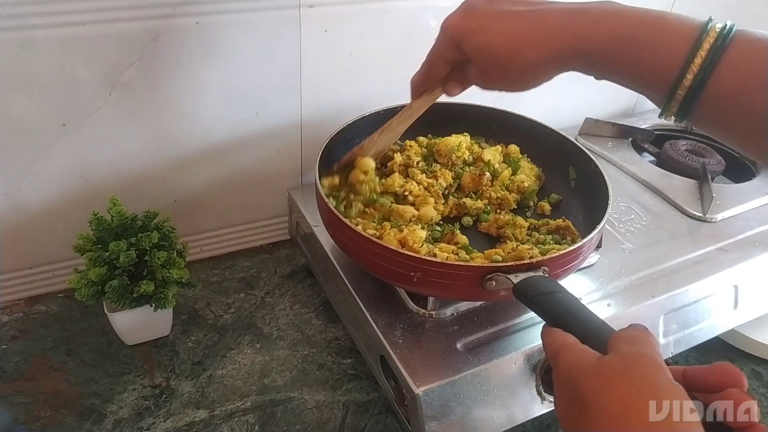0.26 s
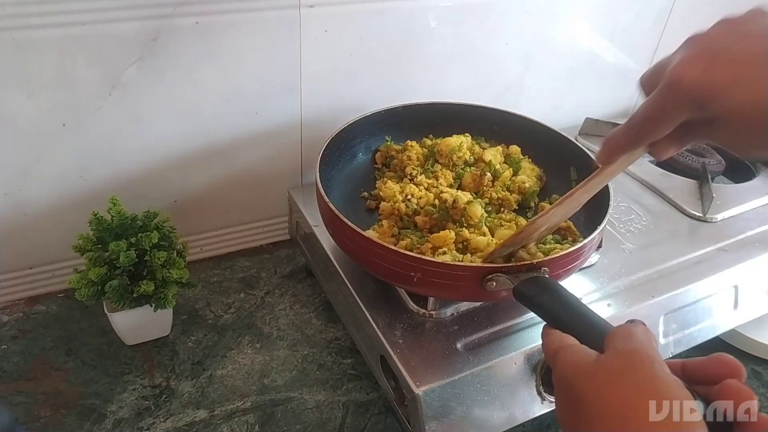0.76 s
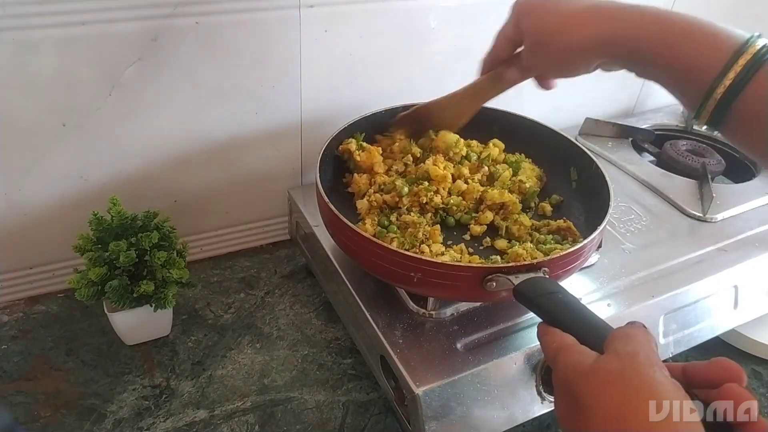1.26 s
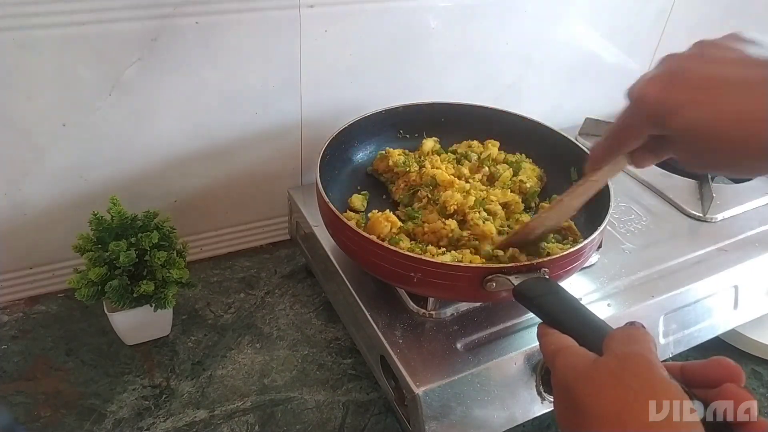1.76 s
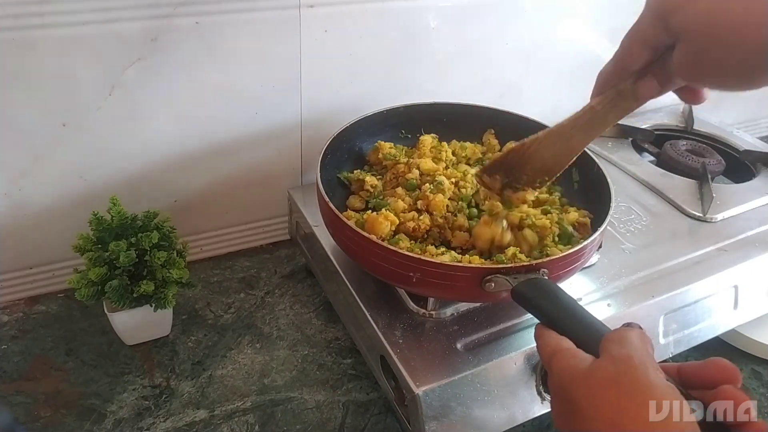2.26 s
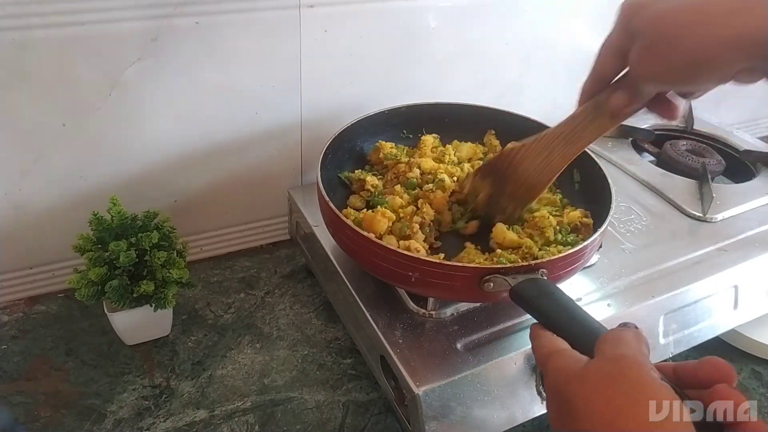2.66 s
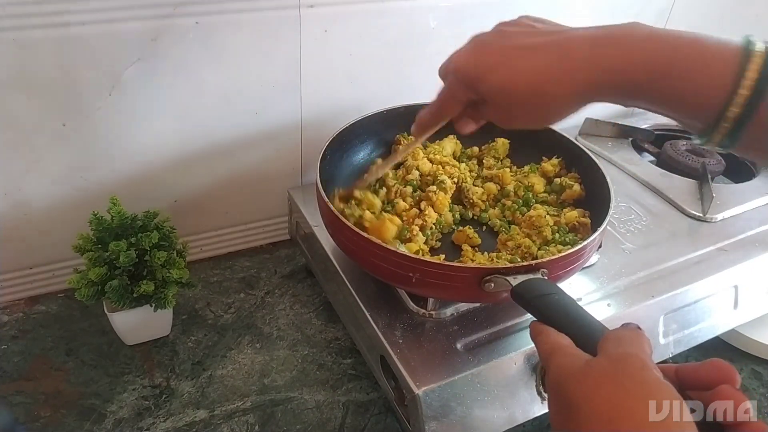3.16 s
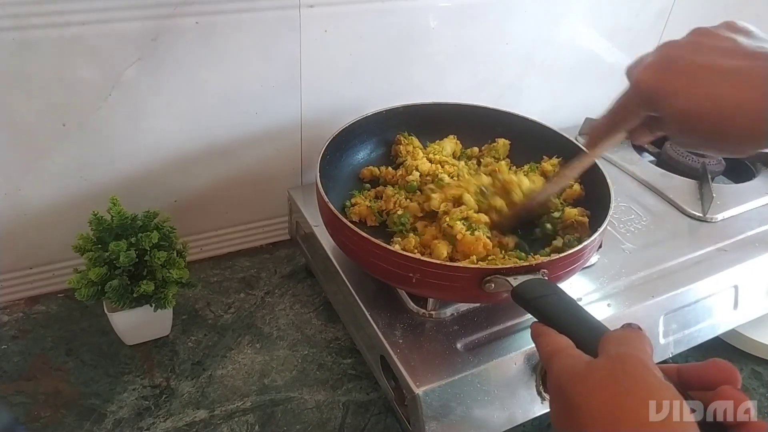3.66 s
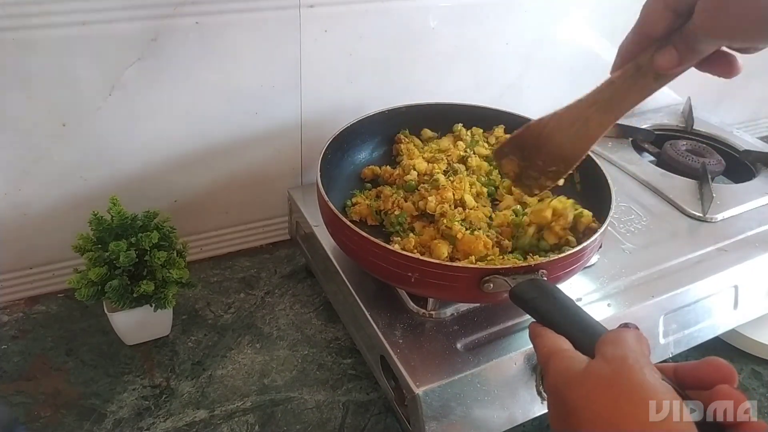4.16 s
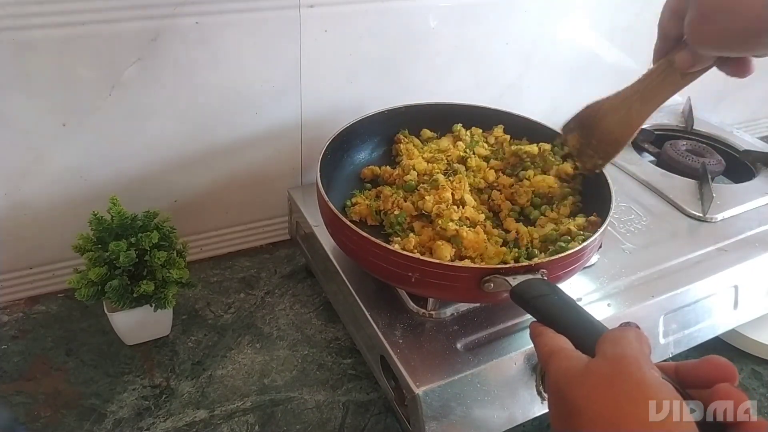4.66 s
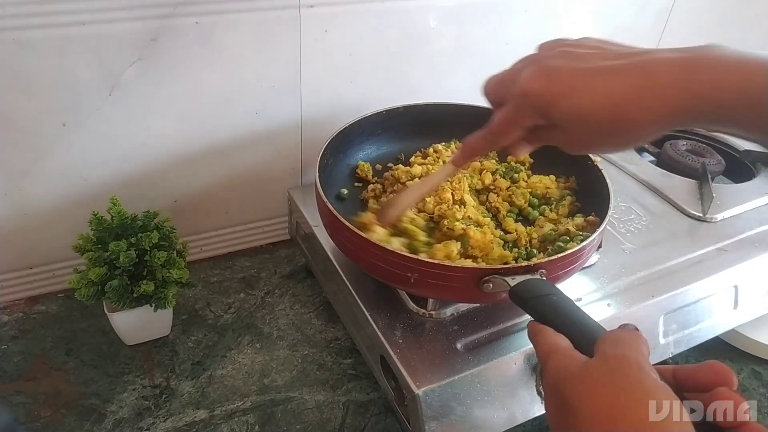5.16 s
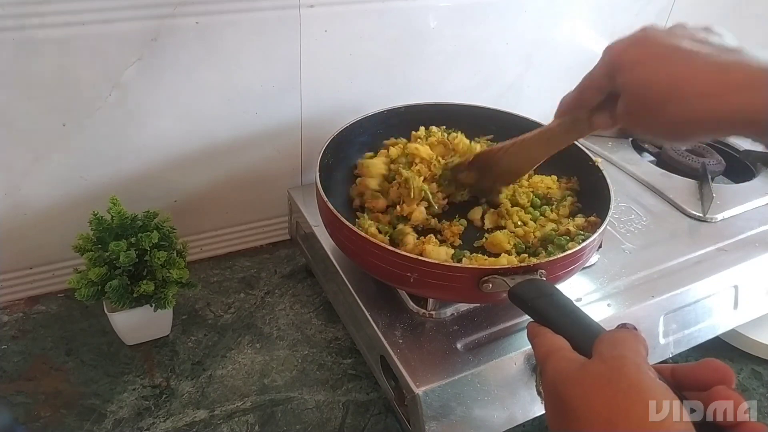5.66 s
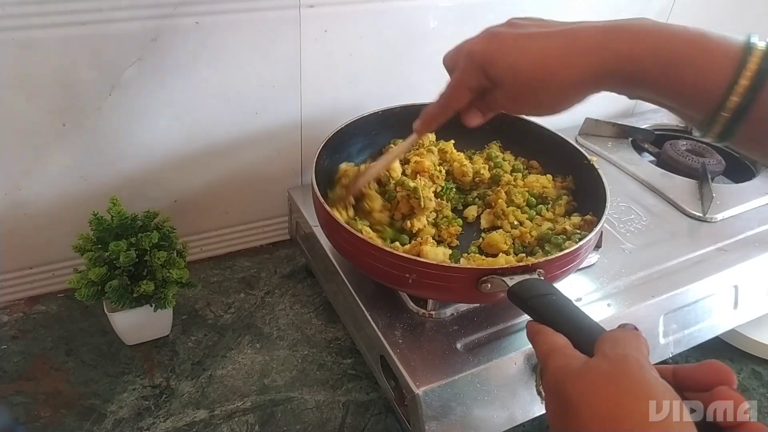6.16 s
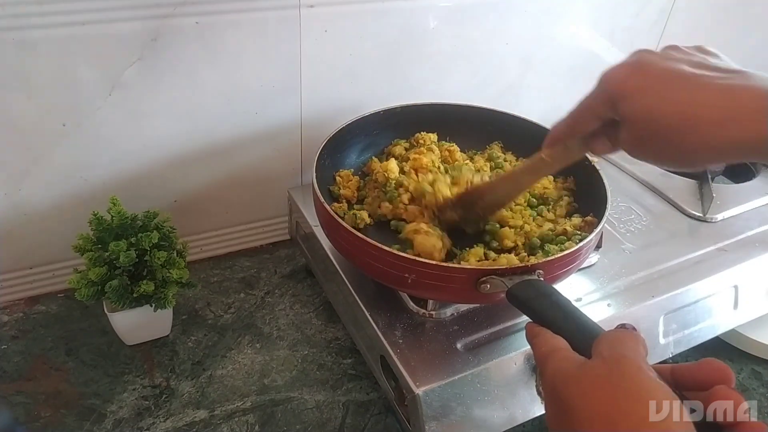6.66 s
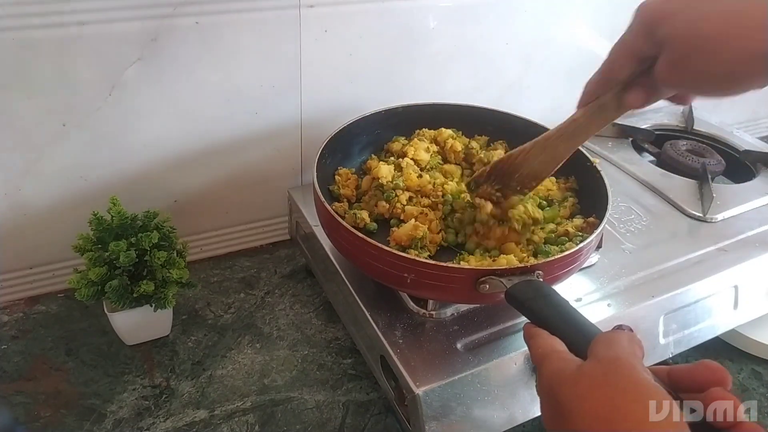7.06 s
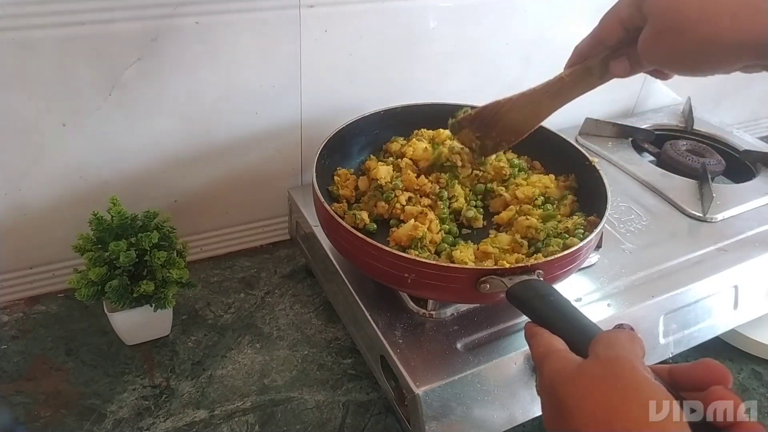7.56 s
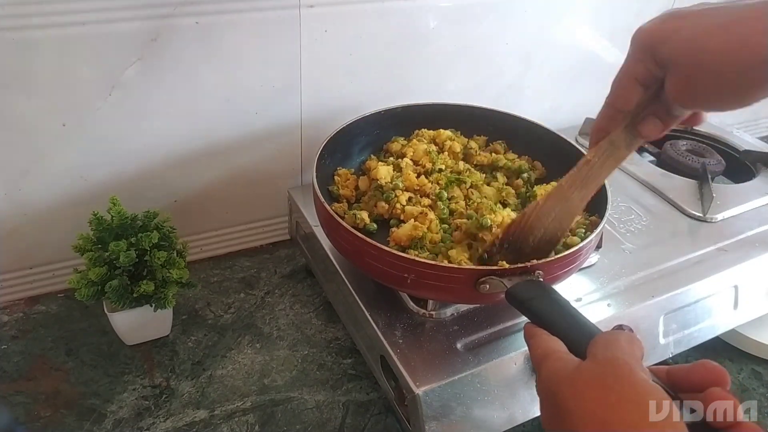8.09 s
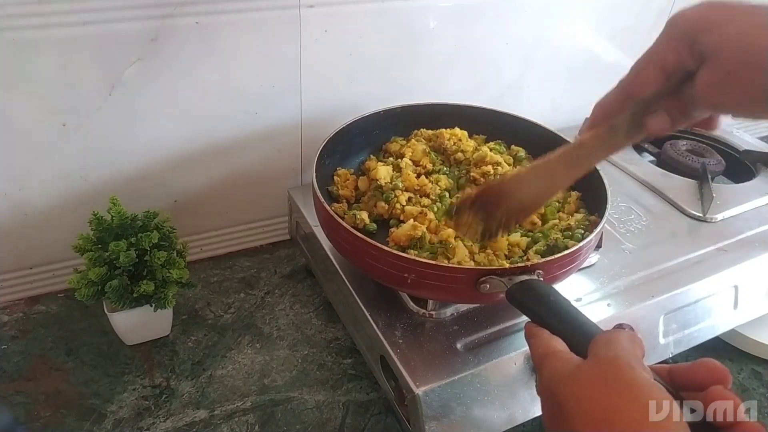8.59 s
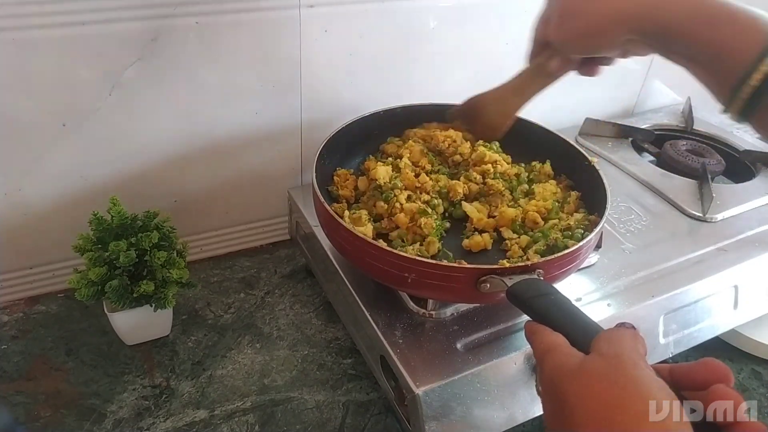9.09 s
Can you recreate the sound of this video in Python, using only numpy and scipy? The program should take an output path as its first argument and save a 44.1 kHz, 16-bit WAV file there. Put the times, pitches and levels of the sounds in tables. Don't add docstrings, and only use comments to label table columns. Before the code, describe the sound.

A wooden spatula knocks and scrapes in a coated frying pan, damp food hissing softly, bangles ticking, in a small echoing kitchen.

```python
import sys
import numpy as np
from scipy import signal
from scipy.fft import rfft, irfft, next_fast_len
from scipy.io import wavfile
from scipy.ndimage import uniform_filter1d

SR = 44100
rng = np.random.default_rng(int(sys.argv[2]) if len(sys.argv) > 2 else 0)


def volts_from_decibels(level):
    exponent = np.asarray(level, float) / 20
    return 10 ** exponent


def int16_out(signal):
    q = np.round(np.clip(np.atleast_2d(signal).T, -1, 1) * 32767)
    wavfile.write(sys.argv[1], SR, q.astype(np.int16))


N = 411453
PORT_LAG = 4

# f/Hz, level/dB, t60/s
PAN = [(152, -7, 0.086), (262.6, -12, 0.31), (345, -14, 0.85), (393.5, -2, 0.16), (462.6, 0.5, 0.11),
       (535, -0.5, 0.091), (620, -3, 0.26), (732, -4, 0.27), (794, -0.5, 0.26), (836, 0.5, 0.097),
       (1068, 5.5, 0.069), (1178, 9, 0.026), (1457, -1.5, 0.04), (1518, 8.5, 0.048), (1740, 18, 0.0083),
       (2210, 5, 0.038), (2370, 11.5, 0.0055), (2526, 10.5, 0.017), (2775, 6, 0.047), (2960, 12, 0.012),
       (3600, 6.5, 0.02), (4300, 5.5, 0.026), (5040, -4, 0.066), (5670, 9.5, 0.0065), (6870, 6.5, 0.0056),
       (8620, 9, 0.012), (8670, 4.5, 0.0062), (10330, -3.5, 0.021), (12600, -33, 0.006)]


def rms_one(x):
    return x / np.sqrt(np.mean(x ** 2) + 1e-20)


def at_hz(points, hz):
    table_hz, values = np.array(points)[:, 0], np.array(points)[:, 1]
    return np.interp(np.log(hz), np.log(table_hz), values)


def drift(rate):
    r = np.exp(-80 * np.pi * rate / SR)
    white = rng.standard_normal(N // 40 + 2002)
    slow = signal.lfilter([1], [1, -2 * r, r * r], white)[2000:]
    return np.interp(np.arange(N) / 40, np.arange(len(slow)), rms_one(slow))


def ring(clicks, hz, t60):
    r, w = volts_from_decibels(-60 / (t60 * SR)), 2 * np.pi * hz / SR
    return signal.lfilter([0, np.sin(w)], [1, -2 * r * np.cos(w), r * r], clicks + 1e-18)


def diffuse(white, gain):
    # f/Hz, level/dB
    side_over_mid = [(28, -1), (60, 2), (120, -5), (200, -7.5), (380, -7.5), (700, 0), (1290, 2.5),
                     (2380, 0.5), (4400, 0), (8120, 0), (15000, 0.5)]
    edges = 20 * 2 ** np.arange(0, 9.8, .4)
    out = 0
    for k, (low, high) in enumerate(zip(edges, edges[1:])):
        band = signal.butter(2, [low, high], "band", fs=SR, output="sos")
        mid, side = signal.sosfilt(band, white[k % 2])
        hz = np.sqrt(low * high)
        share = volts_from_decibels(at_hz(side_over_mid, hz))
        out = out + gain(hz) * (mid + share * side * [[1], [-1]]) / np.sqrt(1 + share ** 2)
    return out


def grains(per_s, spread_db):
    sizes = volts_from_decibels(spread_db * np.minimum(rng.exponential(1, N), 5)) * rng.choice([-1, 1], N)
    return rms_one(sizes * (rng.random(N) < per_s / SR))


def struck(times, levels_db, modes, contact_s, rough):
    at, out = np.round(np.asarray(times) * SR).astype(int), np.zeros(N)
    roughness, fade = rng.choice([-1., 1.], N), np.exp(-1 / (contact_s * SR))
    for k, (hz, db, t60) in enumerate(modes):
        clicks, signs = np.zeros(N), np.roll(roughness, 97 * k)
        clicks[at] = volts_from_decibels(levels_db[:, k] + db)
        rub = signal.lfilter([np.sqrt(1 - fade ** 2)], [1, -fade], clicks + 1e-18)
        out += ring((-1) ** k * (1 - rough) * clicks + rough * signs * rub, hz, t60)
    return out


def ticks(events, modes, offset_db, contact_s, rough):
    s, db = np.transpose(events)
    levels_db = np.repeat(db[:, None] + offset_db, len(modes), axis=1)
    return struck(s, levels_db, modes, contact_s, rough)


def gestures(start, held, db, attack_s, release_db_per_s, rest_db):
    t = np.arange(0, N / SR + .002, .001)
    age = t - np.reshape(start, (-1, 1))
    rise = np.clip(age / max(attack_s, .001), 0, 1)
    fall_db = release_db_per_s * np.clip(age - attack_s - np.reshape(held, (-1, 1)), 0, None)
    power = ((rise * volts_from_decibels(np.reshape(db, (-1, 1)) - fall_db)) ** 2).sum(axis=0)
    return 10 * np.log10(np.interp(np.arange(N) / SR, t, power) + volts_from_decibels(rest_db) ** 2)


def knocks():
    # t/s, peak level/dB, then relative level/dB of thud, body and crack
    blows = [(0.184, -43, 0, -3, 7), (0.6567, -57, 16.5, 7, 9), (0.932, -32, -6, -5, -26),
             (.9445, -37, -3, -11, -8), (.99, -36, -11, -3, -5), (1.044, -41, 0, -4, -13),
             (1.312, -49, 14.5, 0, 6), (1.3274, -35, -13, -2, 1), (1.3345, -39, -16, 0, 1),
             (1.376, -43, 1, -6, 1), (1.8969, -36.5, -34, -24, 2), (2.3395, -53.5, -4, 17, -40),
             (2.637, -46, 5.5, 14.5, 1), (2.6633, -38.5, -1, -5, 1), (3.026, -37.5, 10, 3.5, -24),
             (3.544, -43.5, -6, 2, -8), (3.7299, -22.5, -17, -22, -20), (3.7603, -29.5, -28, -5.5, -21),
             (4.0583, -40, 7.5, -6, -25), (3.77, -48, -8, -7, -5), (4.399, -57, 13, 2, -20),
             (4.409, -34.5, -2.5, -11, 3), (4.5049, -48, 13.5, 3, 14.5), (4.678, -43.5, -4, 0, -11),
             (5.6369, -26.5, -7, -2, -20), (6.7404, -31.5, 3, -13, -4.5), (7.501, -42.5, -17, -4, 7),
             (7.5059, -36.5, -14, -5, -4), (7.514, -39, -11, 6, -3), (7.547, -40, -20, 2, -4),
             (8.7863, -20.5, -12.5, 1, -7.5)]
    # t/s, peak level/dB, flatness of the blade as relative thud level/dB
    nudges = [(2.181, -51.5, -5), (2.377, -72, 11), (3.1779, -52.5, 5), (4.171, -81, 25),
              (4.592, -52.5, 6.5), (4.8093, -58.5, 4), (4.8554, -75, 20), (5.067, -63, 9),
              (6.579, -62.5, -2), (7.27, -64, 12.5), (7.789, -49.5, -8), (8.0985, -52.5, -22),
              (8.1062, -54, -20), (8.4, -67, 14), (8.4594, -50.5, 4), (8.527, -51, -7)]
    centres = [420, 950, 2000, 4500, 9500]
    radiated_db = np.array([5.9, 2.0, 1.27, 7.4, 7.9]) - 3.5
    pan_hz = np.array(PAN)[:, 0]
    held = np.array(PAN) * [1, 1, .2]

    def at_modes(balance_db):
        return at_hz(np.c_[centres, radiated_db + balance_db], pan_hz)

    hard_db = np.array([db + at_modes([thud, body, 0, crack - 8, 0.5 + 0.42 * crack])
                        for s, db, thud, body, crack in blows])
    soft_db = np.array([db + at_modes([thud, 1.5 + 0.51 * thud, 0, -11, 5.5])
                        for s, db, thud in nudges])
    hard = struck(np.array(blows)[:, 0], hard_db, held, contact_s=.003, rough=.4)
    soft = struck(np.array(nudges)[:, 0], soft_db + 3, held, contact_s=.01, rough=.8)
    return hard + soft


def spots():
    # t/s, f/Hz, peak level/dB, t60/s
    favoured = [(0.932, 2050, -45, .015), (1.0195, 4300, -63, 0.023), (1.0195, 2120, -53, 0.036),
                (1.333, 2160, -36, 0.031), (1.8985, 2080, -30.5, 0.017), (1.923, 2170, -35, 0.017),
                (1.935, 750, -42, 0.041), (2.636, 397, -34, 0.027), (2.648, 470, -43, 0.05),
                (3.026, 1650, -34, 0.02), (3.026, 395, -28, 0.045), (3.037, 437, -31.5, 0.045),
                (5.638, 2060, -28, 0.0074), (5.641, 2700, -32, 0.01), (5.651, 1300, -31, .015),
                (5.7225, 4330, -39, .012), (5.6477, 890, -26.5, 0.011), (6.7411, 1670, -37, 0.0089),
                (6.741, 2030, -34.5, 0.021), (3.027, 1046, -36.5, 0.027), (5.638, 3300, -45, 0.012),
                (1.329, 3560, -37, 0.012), (.934, 3300, -45, 0.0086), (3.8237, 4280, -35, .012),
                (7.507, 1380, -38.5, .03), (7.79, 345, -41.5, 0.032), (8.1, 343, -47.5, 0.039),
                (8.461, 1160, -39, 0.014), (8.462, 620, -38, 0.028), (8.545, 770, -40.5, 0.025),
                (8.7857, 1950, -17.5, 0.0094), (8.786, 2700, -18.5, 0.015), (8.787, 3160, -25, 0.0075),
                (8.769, 1090, -47, .02), (8.795, 880, -23, 0.022), (8.7858, 3700, -25, 0.0094),
                (8.787, 4600, -35, 0.019), (8.819, 2000, -31, 0.016)]
    out, length = np.zeros(N + SR), SR // 4
    for s, hz, db, t60 in favoured:
        at = int(s * SR)
        out[at:at + length] += ring(volts_from_decibels(db) * (np.arange(length) == 0), hz, t60)
    return out[:N]


def drag_levels():
    strokes = [(0.0, 0.0056, -48, -8.5), (.12, 0.041, -57.5, -13), (.2, 0.077, -59.5, 5),
               (0.328, 0.069, -52.5, 0), (.74, 0.027, -63, -13), (.94, 0.02, -46.5, -3.5),
               (1.37, 0.023, -55, 0), (1.9, 0.054, -46.5, -1.5), (2.04, 0.037, -58.5, -19),
               (2.24, 0.016, -60.5, 2), (2.365, 0.02, -53.5, -26), (2.649, 0.2, -55.5, -7),
               (3.148, 0.012, -51.5, -15), (3.519, 0.073, -55, -7), (3.742, 0.17, -46.5, -5),
               (3.99, 0.3, -60, -7), (4.5, 0.12, -52.5, -1), (4.819, 0.2, -62.5, 3),
               (5.079, 0.069, -57, -0.5), (5.68, 0.14, -50.5, -4), (6.06, 0.1, -61.5, 5.5),
               (6.189, 0.026, -49, -6), (6.735, 0.013, -40, -5), (6.97, 0.2, -59.5, -5.5),
               (7.54, 0.25, -59, -6), (8.12, 0.091, -55, -3), (8.58, 0.03, -55.5, -9.5),
               (8.94, 0.017, -51, -3.5), (9.151, .2, -58.5, 0)]
    start, held, db, bright_db = np.transpose(strokes)
    attack_s, release_db_per_s = 0.0015, 110.5
    base_db = gestures(start, held, db, attack_s, release_db_per_s, rest_db=-73)
    edge_db = gestures(start, held, db + bright_db, attack_s, release_db_per_s, rest_db=-76)
    return base_db, edge_db


def drag(base_db, edge_db):
    low, high = 0, 0
    slips = grains(per_s=900, spread_db=4.6)
    for k, (hz, db, t60) in enumerate(PAN):
        mode = volts_from_decibels(db + 2.5 * drift(12)) * ring(slips, hz, 0.35 * t60) * (-1) ** k
        low = low + mode * (hz < 1200)
        high = high + mode * (hz >= 1200)
    return volts_from_decibels(base_db - 1.5) * rms_one(low) + volts_from_decibels(edge_db - 1.5) * rms_one(high)


def moans():
    locked = [(.652, 0.0062, 314, -54), (.7, 0.011, 800, -61), (.2, 0.28, 572, -63.5),
              (1.351, 0.055, 1035, -62), (1.92, 0.084, 1025, -60), (2.36, 0.065, 620, -61),
              (4.06, 0.084, 466, -60), (4.809, 0.074, 362, -55.5), (5.0, 0.057, 407, -59),
              (5.065, 0.086, 474, -51), (5.06, 0.051, 780, -55.5), (5.11, 0.062, 880, -58),
              (5.66, 0.14, 1080, -62), (6.07, 0.11, 470, -59), (6.201, 0.068, 1000, -57),
              (7.519, 0.037, 1410, -53), (8.11, 0.11, 345, -60)]
    cycles, fade_s = 45, .02
    out, t = np.zeros(N + SR), np.arange(SR // 2) / SR
    slips = rng.standard_normal((len(locked), SR))
    for (s, held, hz, db), rub in zip(locked, slips):
        shape = np.clip(np.minimum(t, held + 2 * fade_s - t) / fade_s, 0, 1)
        tone = ring(rub, hz, cycles / hz)[SR // 2:]
        steady = tone / np.sqrt(uniform_filter1d(tone ** 2, size=2000))
        at = int(s * SR)
        out[at:at + SR // 2] += volts_from_decibels(db) * shape * steady
    return out[:N]


def grit(edge_db):
    clicks, dealt = grains(per_s=260, spread_db=4.5), rng.integers(0, 8, N)
    cycles = 5
    pitches = np.geomspace(1300, 5500, 8)
    crackle = rms_one(sum(ring(clicks * (dealt == k), hz, cycles / hz) for k, hz in enumerate(pitches)))
    return volts_from_decibels(edge_db - 7) * np.array([np.roll(crackle, PORT_LAG), crackle])


def snaps():
    # t/s, peak level/dB, centre f/Hz, decay time/s
    clacks = [(1.8962, -34, 7000, .004), (2.0505, -35, 9000, 0.0049), (2.277, -39, 7900, .004),
              (3.6628, -38, 8900, 0.0027), (3.7282, -32, 7700, 0.004), (3.7292, -45, 18000, .004),
              (3.882, -34.5, 8000, 0.0044), (3.882, -40, 11000, .003), (4.4098, -42, 4000, 0.0034),
              (4.414, -33.5, 7200, .006), (4.424, -41, 6400, 0.0035), (5.639, -43, 8600, 0.0055),
              (6.7412, -36, 8000, .005), (6.8865, -37, 9000, 0.0064), (0.62, -44, 8000, .003),
              (6.581, -47, 3800, 0.0036), (7.791, -41.5, 2100, 0.0036), (8.7868, -31, 5300, 0.0045),
              (8.931, -37, 7800, .007), (8.931, -38, 13500, .004), (6.9, -39, 8500, .004),
              (5.4, -39, 8000, .004), (2.3396, -42, 1250, 0.0053), (3.5435, -49, 1500, .006),
              (.657, -49, 760, .008), (5.7225, -40, 3700, .01), (1.018, -39, 2500, .006)]
    width, rise_s, alike = 1.5, .0005, .5
    out, t = np.zeros((2, N + SR)), np.arange(SR // 20) / SR
    white = rng.standard_normal((len(clacks), 3, SR // 20))
    for (s, db, hz, dies_s), (both, left, right) in zip(clacks, white):
        band = signal.butter(4, [hz / width, min(hz * width, .45 * SR)], "band", fs=SR, output="sos")
        mixed = alike * both + (1 - alike) * np.array([left, right])
        noise = rms_one(signal.sosfilt(band, mixed))
        shape = np.clip(t / rise_s, 0, 1) * np.exp(-t / dies_s)
        at = int(s * SR)
        out[:, at:at + len(t)] += volts_from_decibels(db - 3) * noise * shape
    return out[:, :N]


def rocks():
    # t/s, peak level/dB
    falls = [(1.017, -30.5), (1.981, -30.5), (3.8225, -32), (5.7226, -29.5), (6.0577, -39.5),
             (6.768, -34.5)]
    # f/Hz, level/dB, t60/s
    stand = [(4337, 3, 0.012), (3900, 3, 0.008), (3300, 3, .006), (990, 5, 0.015), (1760, 7, 0.01),
             (2200, 7, 0.012), (2700, 5, .01), (6800, 0, 0.0065)]
    return ticks(falls, stand, offset_db=-8, contact_s=0.008, rough=.85)


def bangles():
    # t/s, peak level/dB
    touches = [(0.0885, -42), (1.097, -37), (1.5815, -41), (2.051, -31), (2.278, -34), (2.3094, -45),
               (3.1671, -47), (3.8818, -30), (4.1205, -39), (5.8145, -37), (6.887, -33), (7.11, -34),
               (7.6235, -40), (7.7715, -43), (7.8315, -36), (7.8365, -35), (8.5315, -30), (8.9312, -37)]
    # f/Hz, level/dB, t60/s
    glass = [(11320, -4, .02), (11600, -9, .012), (13000, -18, .008), (15300, -21, .006), (9500, -11, .005),
             (5800, -16, .003)]
    return ticks(touches, glass, offset_db=0, contact_s=0.002, rough=.1)


def thumps():
    # t/s, peak level/dB
    loads = [(0.659, -52), (.932, -53), (1.33, -52), (1.9, -52), (2.64, -52), (3.735, -47), (4.402, -46),
             (5.64, -52), (6.74, -59), (7.505, -62), (8.786, -51)]
    # f/Hz, level/dB, t60/s
    stove = [(105, -3, .6), (137, 0, .5), (150, -3, .4), (177, 0, .6)]
    return ticks(loads, stove, offset_db=-6, contact_s=.03, rough=.3)


def hiss_level():
    # t/s, level/dB
    sizzle = [(0, -49), (1.8, -49.5), (2.4, -51), (4.3, -52), (5.498, -51), (5.95, -52.5), (6.5, -51),
              (8, -52.5), (9.33, -49.5)]
    # start t/s, held t/s, level/dB
    turns = [(0.131, 0.033, -44.5), (4.0, 0.072, -50), (4.785, 0.073, -49.5), (6.0, .03, -47),
             (.17, 0.12, -43.5), (.32, 0.074, -43), (1.48, 0.039, -47.5), (2.24, 0.0067, -50),
             (2.62, 0.038, -49.5), (3.098, 0.18, -51.5), (3.76, 0.018, -56), (4.068, 0.0072, -46.5),
             (4.901, 0.026, -43.5), (4.98, 0.2, -45), (6.038, 0.011, -43.5), (6.16, 0.091, -47.5),
             (7.07, 0.01, -49.5), (7.8, 0.0068, -49.5), (8.088, 0.0083, -43.5), (8.22, .04, -60),
             (8.5, 0.01, -54), (9.14, 0.099, -46.5), (9.28, .05, -60)]
    # t/s, level/dB
    spits = [(.08, -49), (.66, -53), (.934, -45), (1.02, -52), (1.33, -48), (1.899, -42.5), (3.028, -41.5),
             (3.728, -42), (4.407, -43.5), (4.505, -44), (5.64, -40.5), (6.58, -57), (6.741, -42.5),
             (7.505, -48), (8.79, -41.5), (8.93, -53)]
    resting_db = np.interp(np.arange(N) / SR, *np.transpose(sizzle))
    turned_db = gestures(*np.transpose(turns), attack_s=.035, release_db_per_s=80, rest_db=resting_db)
    s, db = np.transpose(spits)
    return gestures(s, 0.0039, db, attack_s=0.0018, release_db_per_s=97, rest_db=turned_db)


def hiss(level_db):
    # f/Hz, spectral level/dB per Hz
    hiss_colour = [(1470, -16), (2500, -19), (2680, -13), (3330, -15.5), (4130, -14), (4560, -16),
                   (6120, -12.5), (6560, -11), (6970, -11), (9790, -3.5), (11200, -11), (11700, -17.5),
                   (15300, -19), (15800, -53)]
    white = rng.standard_normal((2, 2, N)) * volts_from_decibels(.7 * drift(90))
    flicker = diffuse(white, lambda hz: volts_from_decibels(1.2 * drift(40)) * (hz > 1400))
    size = next_fast_len(N)
    colour = volts_from_decibels(at_hz(hiss_colour, np.fft.rfftfreq(size, 1 / SR) + 1))
    coloured = irfft(rfft(flicker, size) * colour, size)[:, :N]
    return volts_from_decibels(level_db) * rms_one(coloured)


def kitchen(x, wet_db):
    # f/Hz, t60/s
    room_t60 = [(150, 1.0), (400, 0.78), (1000, 0.83), (2800, 0.7), (6000, 0.69), (12000, 0.067)]
    t = np.arange(SR) / SR
    uneven_db = rng.normal(0, 1, SR // 40 + 1).repeat(40)[:SR] * 2.66
    lumps = volts_from_decibels(uneven_db * np.exp(-t / 0.076))
    near_walls = 1 + 1.3 * np.exp(-t / .018)
    onset = np.clip((t - .002) / 0.00028, 0, 1)
    white = rng.standard_normal((2, 2, SR)) * lumps * near_walls * onset
    tail = diffuse(white, lambda hz: volts_from_decibels(-60 * t / at_hz(room_t60, hz)))
    tail = volts_from_decibels(wet_db) * rms_one(tail) / np.sqrt(SR)
    tail[0, PORT_LAG] = tail[1, 0] = 1
    return signal.fftconvolve(x[None], tail, axes=1)[:, :N]


def hum():
    # f/Hz, spectral level/dB per Hz
    rumble = [(12, -29), (20, 10), (33, 5.5), (60, 1.5), (99, -2.5), (304, -2.5), (359, -1), (668, -6),
              (808, -2.5), (1300, -14.5), (2730, -12.5), (3380, -68), (3720, -38), (4730, -10),
              (6000, -66.5), (7800, -50), (13200, -120)]
    white = rng.standard_normal((2, 2, N))
    field = diffuse(white, lambda hz: volts_from_decibels(at_hz(rumble, hz) + 3.95 * drift(6.3)) * (hz < 7000))
    return volts_from_decibels(-59) * rms_one(field)


def band_dropouts(x, depth_db, hold):
    # f/Hz, share of time a band is lost
    lost_share = [(2300, 0), (3300, .4), (3800, .2), (5500, .32), (7700, .25), (8500, .03), (11650, .02),
                  (11900, .4), (12900, .5), (14000, .33), (14900, .15), (15350, .45), (15600, .992),
                  (16300, .994), (16450, 1.1)]
    hz, s, cells = signal.stft(x, SR, nperseg=1024)
    band = np.arange(len(hz)) // 5
    first = np.flatnonzero(np.diff(band, prepend=-1))
    level = np.log(np.add.reduceat((abs(cells) ** 2).sum(axis=0), first) + 1e-18)
    chance = signal.lfilter([1], [1, -hold], rng.standard_normal(level.shape))
    rank = (chance + 0.51 * level).argsort(axis=1).argsort(axis=1) / len(s)
    lost = rank[band] < at_hz(lost_share, hz + 1)[:, None]
    return signal.istft(cells * np.where(lost, volts_from_decibels(depth_db), 1), SR, nperseg=1024)[1][:, :N]


def scene():
    base_db, edge_db = drag_levels()
    moan = moans()
    pan = knocks() + spots() + volts_from_decibels(-6.0) * moan + drag(base_db, edge_db) + rocks()
    bass_cut = signal.butter(3, 215, "high", fs=SR, output="sos")
    pan = signal.sosfilt(bass_cut, pan)
    near = kitchen(pan, wet_db=1.5) + kitchen(bangles(), wet_db=-4.5)
    near = near + thumps()
    near = near + volts_from_decibels(-1.5) * moan
    return near + hiss(hiss_level()) + hum() + snaps() + grit(edge_db)


def low_pass(x):
    return signal.sosfilt(signal.butter(12, 16510, fs=SR, output="sos"), x)


def record(dry):
    mix = band_dropouts(dry, depth_db=-41, hold=0.88)
    return low_pass(mix)


dry = scene()
out = record(dry)
int16_out(out)
```